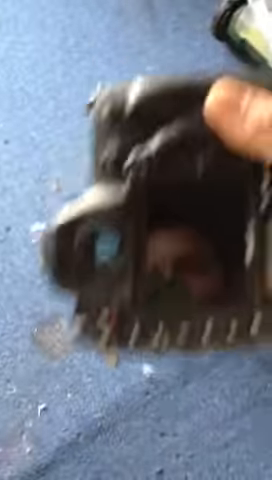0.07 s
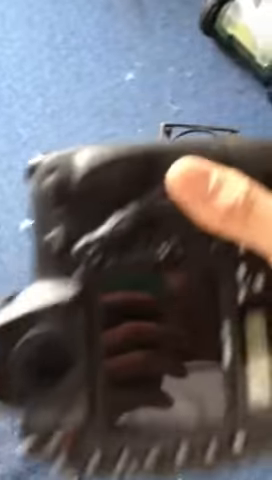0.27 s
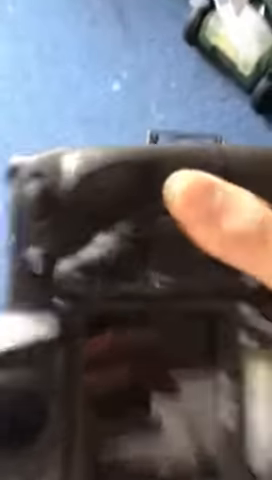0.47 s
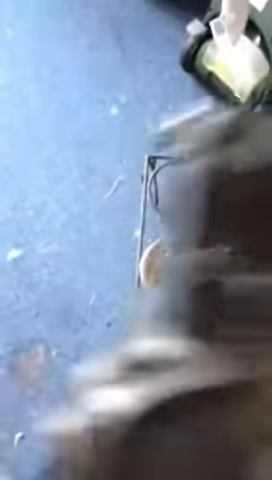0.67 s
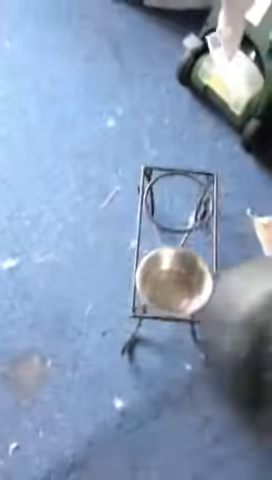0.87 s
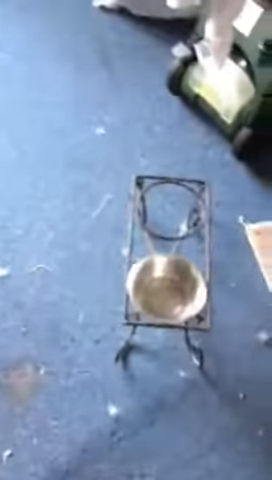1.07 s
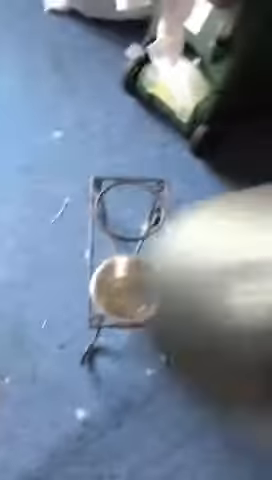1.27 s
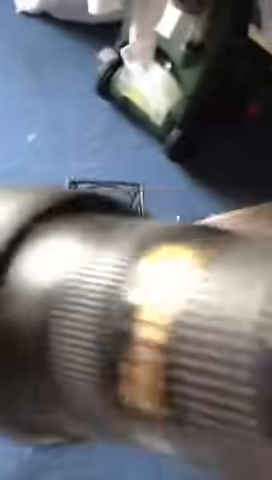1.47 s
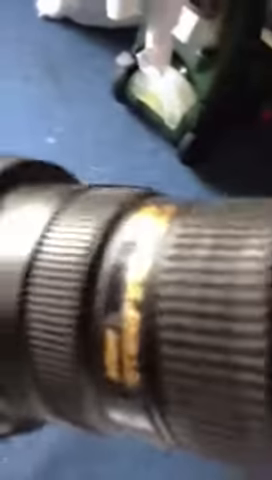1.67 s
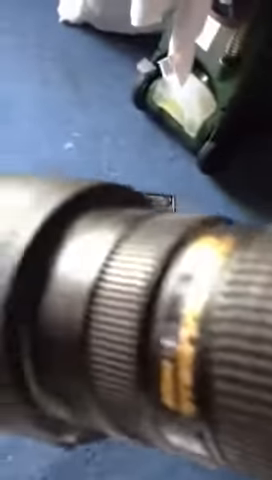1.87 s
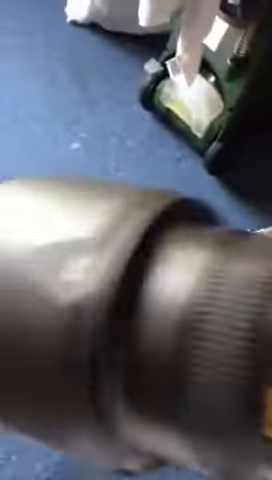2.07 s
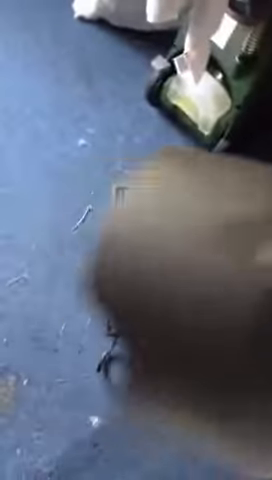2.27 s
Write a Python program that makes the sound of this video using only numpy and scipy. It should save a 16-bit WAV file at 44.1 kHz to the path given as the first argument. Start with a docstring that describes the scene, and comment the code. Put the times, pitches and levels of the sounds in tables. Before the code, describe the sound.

A camera shutter fires a rapid burst of thirteen crisp mechanical clacks, growing slightly louder as it nears the microphone. It stops, leaving two faint handling ticks and soft ventilation in a small, quiet room.

```python
"""Camera burst, close up

In a small, quiet room a reflex camera fires thirteen fast frames while it is swung close to the
microphone. Every frame repeats one run of impacts (latch, mirror, shutter blades, recocking), each
with the ring of its own part. The clatter grows as the camera nears; two faint handling ticks
follow, and ventilation murmurs in the background."""
import sys
import numpy as np
from scipy import signal
from scipy.fft import rfft, irfft
from scipy.io import wavfile
from scipy.ndimage import uniform_filter1d

SR = 44100
rng = np.random.default_rng(int(sys.argv[2]) if len(sys.argv) > 2 else 0)


def unload_wav(signal):
    """Save mono or channel-first audio to the path in sys.argv[1] as 16-bit WAV at rate SR, clipped to [-1, 1]."""
    wavfile.write(
        sys.argv[1],
        SR,
        np.round(np.clip(np.atleast_2d(signal).T, -1, 1) * 32767).astype(np.int16),
    )


N = 105840
FIRST_S, FRAME_S, FRAMES = .2141, .09397, 13
ATTACK_S = .0003


# The impacts of one frame. Levels are relative, with the camera far from the microphone, turned, near:
# start_s, far_db, turned_db, near_db, t60_s, mid_db, treble_db, top_db
IMPACTS = [(0.0023, 4, 1.5, 5.5, 0.013, -7, -3, -5.5), (0.0075, 3.5, 2.5, 3, 0.009, -2.5, 8.5, 9),
           (0.0211, 7, 6, 5, 0.022, -4, -3, 0), (0.0229, -7, -1, -2, 0.02, 12.5, 0, -13),
           (0.0267, -7, -2, 2, 0.0184, -2, -15, -32), (0.0389, -3, -1, -0.5, 0.0415, -5.5, -2.5, -5),
           (0.0427, -2.5, -3, -5, 0.0125, 5, 7, 8.5), (0.0466, -3, -4.5, -2, 0.0217, 4.5, -7.5, 10.5),
           (0.0502, 2.5, -3, 2, 0.0137, 1, 4, 2.5), (0.052, -7.5, -1, -5, 0.01566, 7, 1.5, 1.5),
           (0.0593, -2.5, -4.5, 0, 0.0352, -12, -2, -10), (0.069, 4, 2.5, 2.5, 0.028, -2, 1, 1.5),
           (0.0729, 1, 1, 2.5, 0.0089, 0.5, 3, 0.5), (0.0739, -4, -2, 3, 0.01985, 6.5, 1.5, -6),
           (0.0754, -1.5, -0.5, 1.5, 0.0256, -5.5, 0.5, -1.5), (0.0776, 4.5, 6.5, 5, 0.028, -4, -2.5, 2)]
# Spectrum of the housing's dense ring: frequency_hz, level_db
HOUSING_SPECTRUM = [(60, -40.5), (200, -10.5), (400, -5), (560, -7.5), (740, -10.5), (950, -2),
                    (1500, -0.5), (1800, -1.5), (2700, 1), (3300, 0), (4600, 1), (5400, -2), (7200, -3),
                    (8500, -7.5), (10000, -14.5), (11300, -15), (12700, -12), (15500, -19)]

def impact(start_s, far_db, turned_db, near_db, t60, mid_db, treble_db, top_db, size=4096):
    """One impact, repeated every frame: a snap of contact and the housing's ring, whose top dies first."""
    t = np.arange(size) / SR
    alike, top_t60_share = .85, .836
    snap = undb(top_db - 10.5) * fade(t, t60=.001263)
    envelope = np.minimum(t / ATTACK_S, 1) * fade(t, t60) + snap
    top_envelope = fade(t, t60 * top_t60_share) / np.sqrt(top_t60_share)
    same = fade(t, t60=.07)  # the ring starts much alike from frame to frame; its tail differs
    cracks, grain = np.zeros(N), rng.standard_normal(size)
    for frame in range(FRAMES):
        grain = alike * grain + np.sqrt(1 - alike ** 2) * rng.standard_normal(size)
        noise = same * grain + np.sqrt(1 - same ** 2) * rng.standard_normal(size)
        top = band(noise, 12500, octaves=.55)
        ring = flatten((noise - top) * envelope + top * top_envelope) * np.linalg.norm(envelope)
        force = undb(pose_db(frame, far_db, turned_db, near_db) + .4 * rng.standard_normal())
        jitter_s = .0001 * rng.standard_normal()
        add(cracks, FIRST_S + frame * FRAME_S + start_s + jitter_s, force * ring)
    tilt = [(600, 0), (900, mid_db), (1300, mid_db), (2300, 0), (4200, 0),
            (7000, treble_db), (9000, treble_db), (12500, top_db)]
    return colour(cracks, lambda f: curve(HOUSING_SPECTRUM, f) + curve(tilt, f))


# Notes of the struck parts, at relative levels: start_s, pitch_hz, far_db, turned_db, near_db
PART_NOTES = [(.0023, 2590, -6, -22, -2), (.0023, 6480, -7.5, -18, -31.5), (.0075, 1415, -7.5, -11.5, -24),
              (.0075, 6470, -15, -2, -7), (0.0222, 1240, -6, -7.5, -16), (0.0212, 2850, -9.5, -15, -6.5),
              (0.0207, 4170, -2.5, -14, -16), (0.0267, 1449, -7.5, -6, -5.5),
              (0.0266, 1165, -20.5, -7, -10), (0.0389, 1110, -11, -9, -6), (.0388, 3730, -14, -8.5, -8),
              (0.0463, 1130, -17.5, -5, -9), (.0516, 1465, -3, -5, -7.5), (.0738, 1766, -37.5, 0, -22.5),
              (0.0737, 2250, -4.5, -0.5, -5), (0.0776, 4669, 1, -27.5, -1)]

def ringing_parts(t60=.018):
    """Each part rings briefly at its own pitch when the mechanism strikes it."""
    return sum(struck_mode(start_s, hz, t60, *levels) for start_s, hz, *levels in PART_NOTES)


# Modes of the camera body, at relative levels: pitch_hz, t60_s, far_db, turned_db, near_db
BODY_MODES = [(331.57, 0.1293, -17, -17, -22.5), (643, 0.036, -32, -20, -10.5),
              (951.5, 0.2303, -17.5, -29.5, -30.5), (1448.2, 0.0384, 2, -4.5, 0)]

def mirror_slap(start_s=.0735):
    """The heaviest blow of each frame sets the hollow body ringing."""
    return sum(struck_mode(start_s, *mode, rise_s=.00253) for mode in BODY_MODES)


def struck_mode(start_s, hz, t60, far_db, turned_db, near_db, rise_s=ATTACK_S):
    """A dying note, struck once a frame at a slightly varied pitch; its level follows the camera's pose."""
    out, t, phase = np.zeros(N), np.arange(8192) / SR, rng.random()
    envelope = np.minimum(t / rise_s, 1) * fade(t, t60)
    for frame in range(FRAMES):
        pitch_hz = hz * (1 + .018 * rng.standard_normal())
        force = undb(pose_db(frame, far_db, turned_db, near_db))
        tone = np.sin(2 * np.pi * (pitch_hz * t + phase))
        add(out, FIRST_S + frame * FRAME_S + start_s, force * envelope * tone)
    return out


def whirr(start_s=.034, length_s=.05756, from_hz=430, to_hz=690.5):
    """One upward glide a frame, probably the recocking motor, heard as the camera comes close."""
    out, progress = np.zeros(N), np.linspace(0, 1, int(length_s * SR))
    cycles = np.cumsum(from_hz + (to_hz - from_hz) * progress) / SR
    for frame in range(FRAMES):
        glide = np.sin(np.pi * progress) * np.sin(2 * np.pi * (cycles + rng.random()))
        add(out, FIRST_S + frame * FRAME_S + start_s, undb(-38.5 + 1.6118 * frame) * glide)
    return out


def gears(end_s=1.425):
    """The drive rasps softly between the impacts and stops with the last frame."""
    t = np.arange(N) / SR
    running = (t > FIRST_S + IMPACTS[0][0]) & (t < end_s)
    return undb(-22) * colour(rng.standard_normal(N) * running, lambda f: curve(HOUSING_SPECTRUM, f))


def radiate(x, gain_db=-20.5, low_cut_hz=170):
    """The small body gives off hardly any bass."""
    return undb(gain_db) * signal.sosfilt(signal.butter(2, low_cut_hz, "high", fs=SR, output="sos"), x)


# Stages of the swing: far_until_frame, turned_from_frame, turned_until_frame, near_from_frame
POSE_FRAMES = [3, 4.7, 7, 8.5]

def pose_db(frame, far_db, turned_db, near_db):
    """A part's level as the camera goes from far, through its turn, to near the microphone."""
    return np.interp(frame, POSE_FRAMES, [far_db, turned_db, turned_db, near_db])


# The direct sound at the microphone during the swing: time_s, gain_db, presence_db, top_db
APPROACH = [(.25, -2, -2.5, -3), (0.518, 0.5, -4.5, -1.5), (0.744, 2.55, -0.5, 3), (1.0, 2.34, 0.5, -5.5),
            (1.181, 2.36, 2, -1.5), (1.4, 3.5, 1.5, -2.5)]

def approach(x):
    """The direct sound grows and changes colour as the camera nears and turns."""
    times, *columns = np.array(APPROACH).T
    gain, presence, top = (undb(np.interp(np.arange(N) / SR, times, db)) for db in columns)
    return gain * (x + (presence - 1) * band(x, 2550, .3) + (top - 1) * band(x, 12000, .5))


# Ticks close to the microphone after the burst: start_s, relative_db, centre_hz, width_octaves, t60_s
HANDLING_TICKS = [(1.662, -54, 4700, 0.81, 0.022), (2.323, -54.5, 1750, 0.87, 0.072)]

def handling(size=8192):
    """Faint ticks of the camera in the hand."""
    out, t = np.zeros(N), np.arange(size) / SR
    for start_s, db, hz, octaves, t60 in HANDLING_TICKS:
        noise = unit(band(rng.standard_normal(size), hz, octaves))
        add(out, start_s, undb(db) * noise * fade(t, t60))
    return out


def room(x, tail_db=-6.5, delay_s=.003, echo_s=.025, echo_db=-19.5, change_s=.3, size=16384):
    """One wall echo and a short tail whose top dies first; the reflections change as the camera moves."""
    t, out = np.arange(size) / SR, np.zeros(N)
    onset = np.clip(t / delay_s - 1, 0, 1)
    for centre_s in np.arange(0, N / SR + change_s, change_s):
        noise = rng.standard_normal(size)
        top = band(noise, 12000, octaves=.8)
        tail = ((noise - top) * fade(t, t60=.165) + top * fade(t, t60=.15)) * onset
        response = undb(tail_db) * tail / np.linalg.norm(tail)
        add(response, echo_s, undb([echo_db]))
        crossfade = np.maximum(1 - np.abs(np.arange(N) / SR - centre_s) / change_s, 0)
        out += signal.fftconvolve(x * np.sqrt(crossfade), response)[:N]
    return out


# Room tone, the spectrum of the moving air: frequency_hz, relative_db
AIR_SPECTRUM = [(30, -71), (52, -16.5), (95, -19.5), (160, -5), (420, -4), (520, -13.5), (1000, -14.5),
                (1400, -21.5), (3800, -26.5), (7000, -28.5), (8500, -33.5), (9800, -42), (13000, -34.5),
                (15500, -36)]
# Fan resonances in the background: centre_hz, width_hz, level_db
FAN_RESONANCES = [(190.9, 14.8, -61.5), (274.14, 9.1, -61.5), (353.2, 18.7, -60), (455.7, 4.13, -66)]

def ventilation(air_db=-54.5, rise_db_per_s=.62):
    """Soft air noise with a few wavering fan resonances, slowly growing a little louder."""
    air = undb(air_db) * unit(colour(rng.standard_normal(N), lambda f: curve(AIR_SPECTRUM, f)))
    fan = sum(undb(db) * unit(band(rng.standard_normal(N), hz, width / hz))
              for hz, width, db in FAN_RESONANCES)
    t = np.arange(N) / SR
    return (air + fan) * undb(rise_db_per_s * (t - t.mean()))


def undb(db):
    return 10 ** (np.asarray(db) / 20)


def unit(x):
    return x / np.sqrt(np.mean(x ** 2))


def fade(t, t60):
    return np.exp(-np.log(1000) * t / t60)


def add(out, start_s, x):
    i = int(start_s * SR)
    out[i:i + len(x)] += x[:len(out) - i]


def curve(points, hz):
    """Points of (frequency_hz, level_db) joined on a log-frequency axis."""
    f, db = np.array(points, float).T
    return np.interp(np.log(hz + 1), np.log(f), db)


def colour(x, db_at, size=4096):
    """Causal filter with the gain db_at(hz)."""
    cepstrum = irfft(np.log(undb(db_at(np.fft.rfftfreq(size, 1 / SR)))))
    cepstrum[1:size // 2] *= 2
    cepstrum[size // 2 + 1:] = 0
    return signal.fftconvolve(x, irfft(np.exp(rfft(cepstrum))))[:len(x)]


def band(x, hz, octaves):
    """Bell-shaped band around a centre."""
    f = np.fft.rfftfreq(len(x), 1 / SR) + 1
    return irfft(rfft(x) * np.exp(-.5 * (np.log2(f / hz) / octaves) ** 2), len(x))


def flatten(x, width_hz=1500):
    """Levels the broad spectral humps of a noise burst and keeps its fine grain."""
    power = uniform_filter1d(np.abs(rfft(x)) ** 2, int(width_hz * len(x) / SR))
    return colour(x, lambda f: -10 * np.log10(power), size=len(x))


def scene():
    """At one microphone: the nearing clatter, the hollow body, the room's answer and the ventilation."""
    notes = ringing_parts()
    impacts = sum(impact(*row) for row in IMPACTS)
    clatter = radiate(impacts + notes + gears()) + handling()
    body = radiate(mirror_slap() + whirr())
    return (approach(clatter) + body + room(clatter + body) + ventilation())[None]


def record(dry, top_hz=15700):
    """The recorder cuts the top steeply."""
    return signal.sosfilt(signal.ellip(10, .2, 70, top_hz, fs=SR, output="sos"), dry)


dry = scene()
out = record(dry)
unload_wav(out)
```